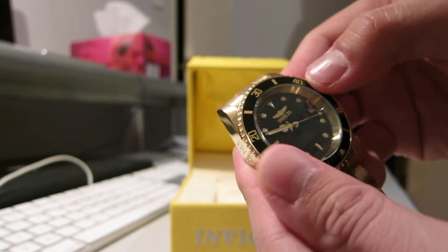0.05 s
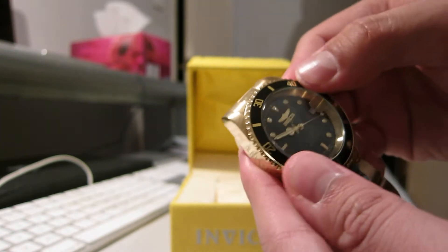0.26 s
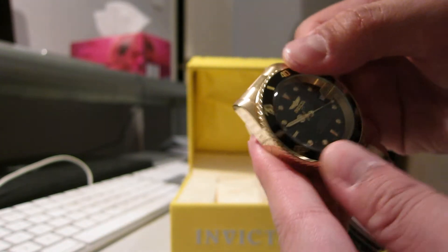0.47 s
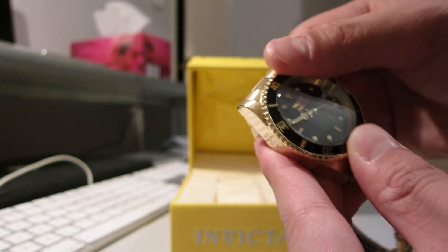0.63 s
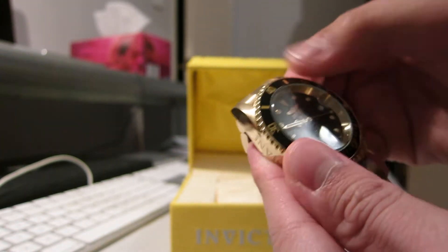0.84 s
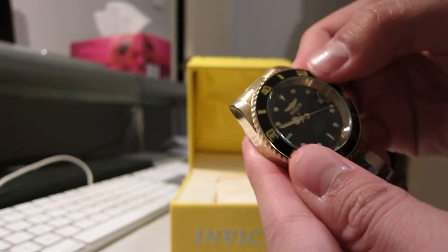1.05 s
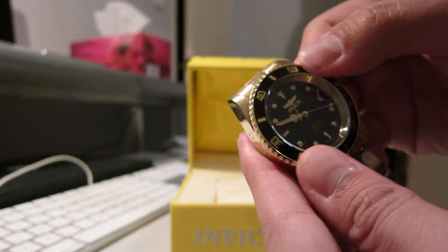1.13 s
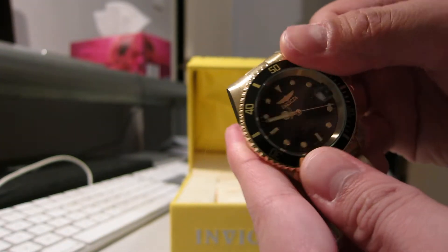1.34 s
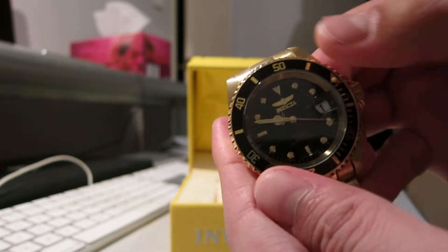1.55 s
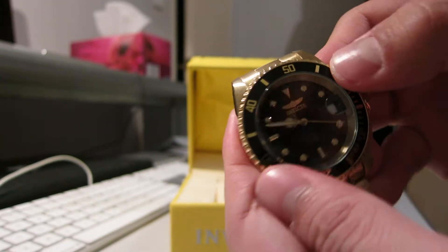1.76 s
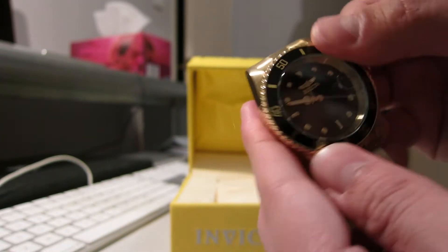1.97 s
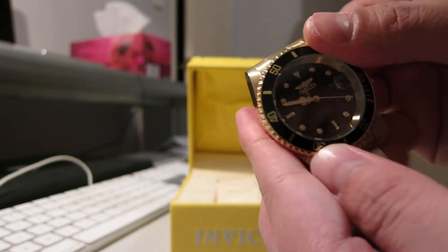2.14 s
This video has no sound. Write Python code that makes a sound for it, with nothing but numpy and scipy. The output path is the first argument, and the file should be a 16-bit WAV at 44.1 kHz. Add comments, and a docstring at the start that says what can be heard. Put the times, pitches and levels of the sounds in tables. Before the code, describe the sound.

Crisp, rapid clicks of a wristwatch bezel turned three times, with light finger handling.

```python
"""The ratcheting bezel of a metal wristwatch, turned in three quick runs close to a stereo microphone.
The pawl snaps over each tooth and rings the case, coloured by the changing grip. Around the runs
the bezel ticks in its play, fingers rub and slide, and the watch takes a few dull knocks.
The room is quiet: low rumble and hiss, one echo off the desk and a faint tail."""
import sys
import numpy as np
from scipy import signal
from scipy.fft import rfft, irfft
from scipy.io import wavfile

SR = 44100
rng = np.random.default_rng(int(sys.argv[2]) if len(sys.argv) > 2 else 0)


def persist_wave(psi):
    """Save psi, clipped to +-1, as 16-bit WAV."""
    counts = np.round(np.clip(psi, -1, 1) * 32767).astype(np.int16)
    wavfile.write(sys.argv[1], SR, np.atleast_2d(counts).T)


N = 97020

# room tone spectrum: f/Hz, relative level/dB
ROOM_TONE = [(26, -77), (36, 4), (48, -18), (75, 2.5), (115, 3), (250, 2), (500, -1.5), (1000, -8.5),
             (2500, -16.5), (6000, -23.5), (11000, -27), (14000, -40), (16000, -24.5)]
# likeness of the room tone left and right: f/Hz, correlation (clipped to -1..1 in use)
ROOM_LIKENESS = [(40, 0.2), (150, -0.52), (400, -0.73), (1000, -0.47), (3000, -0.21), (10000, -1.3)]
# colour of the desk echo and room tail: f/Hz, gain/dB
REFLECTION_COLOUR = [(500, 0), (2500, -3), (5000, -2), (8000, -2), (10500, 3), (12500, 0), (14300, -3),
                     (15300, -7), (16300, -16)]
# direct sound at the microphone, left minus right: f/Hz, level/dB
BALANCE = [(1300, -1), (4400, 0), (8100, 1.3), (15000, 2.8)]
# skin rubbing on the case: t/s, level/dB
RUB_LEVEL = [(0, -62.5), (.25, -62.5), (.52, -52), (.66, -58.5), (.88, -62), (1.02, -58), (1.12, -76),
             (1.5, -71.5), (1.82, -60.5), (1.92, -61), (2.2, -101.5)]
# spectrum of that rubbing: f/Hz, relative level/dB
RUB_SPECTRUM = [(30, -12), (100, 2.5), (180, 2), (400, -4), (800, -4.5), (1500, -10.5), (3000, -14.5),
                (16000, -41)]
# fingers sliding over the knurled rim: t/s, level/dB
SLIDE_LEVEL = [(0, -63.5), (.3, -71), (.7, -62.5), (.92, -71), (1.02, -64.5), (1.42, -69.5), (1.83, -68.5),
               (2.1, -75), (2.2, -60.5)]
# handling knocks: t/s, level/dB, tilt/(dB per octave)
HANDLING_KNOCKS = [(1.3604, -24, -6), (1.491, -31.5, -4), (1.735, -8.5, -1), (1.855, -26, -5)]
# modes of a knock: f/Hz, peak/dB, t60/s
DULL_MODES = [(505, 13.5, 0.076), (793, -0.5, 0.0084), (1317, 14, 0.02), (1516, 10, 0.015),
              (2160, 0, 0.012), (2890, -4, .008), (4660, -7, 0.0061)]
# ticks of the bezel's play and the bracelet: t/s, level/dB, extra on the lowest mode/dB
PLAY_TICKS = [(0.0584, -31, -35), (0.1078, -33.5, -9), (0.1257, -40, -17), (0.1597, -32, -20),
              (0.194, -25, -23), (0.2747, -30, -17), (0.6464, -29.5, -28), (0.8693, -40, -24),
              (1.0155, -33.5, -11.5), (1.3579, -41.5, -3.5), (1.384, -40, -19), (1.4561, -44.5, -3.5),
              (1.4879, -35.5, -7.5), (1.4924, -46.5, 7.5), (1.691, -38.5, -34), (1.79, -40.5, -19),
              (1.814, -42, -14), (1.8345, -31.5, -9.5), (1.891, -28.5, -14), (2.1677, -45, -24.5)]
# modes of a tick: f/Hz, peak/dB, t60/s
LIGHT_MODES = [(3130, 14.5, 0.00037), (6290, 21, 0.0043), (8940, 17, 0.0049), (10770, 16.5, 0.0018),
               (12300, 8, 0.0013), (14500, -3.5, 0.00054)]
# modes of case and bezel: f/Hz, peak/dB, t60/s (before the grip changes them)
CASE_BEZEL_MODES = [(2282, 2.93, 0.0042), (3478, 12, 0.012), (3587, 12, 0.015), (3773, 16.5, 0.026),
                    (4590, 2, 0.0023), (5400, 6.5, 0.0027), (6285, 12, 0.0037), (7130, 15.5, 0.0036),
                    (7967, 20, 0.0076), (8890, 18, 0.0049), (9980, 17, 0.0039), (10840, 14.5, 0.0046),
                    (12110, 15.5, 0.0039), (13800.0, 15.5, 0.0058), (14800, 18.5, 0.0058),
                    (16230, -9, 0.00067)]
# the case singing on faintly: f/Hz, peak/dB, t60/s
RING_OUT_MODE = [(3787, 9.5, 0.15)]
# the hand's hold: t/s, extra on the body/dB, chatter/dB, bezel t60 factor, top ring f/Hz,
# extra on the mid treble/dB, extra on the air band/dB, case t60 factor
GRIP = [(0.35, -0.3, -9.5, 1.26, 13870, 3, -13, 1.97), (0.505, 1, -2.5, 1.6, 13800, -9, 1.5, 1.3),
        (0.58, -2, -13, 1.1, 14300, -3, -12, 1.16), (1.079, 0.5, -13.5, 0.71, 14000, 1.1, -8, 1.88),
        (1.3, 1.4, -17, 1.04, 13500, 6, -5, 0.78), (1.92, -9.5, -15.5, 0.92, 13240, -4.5, -4.5, 0.7)]
# pawl snaps: t/s, level/dB, then extra/dB on the case ring, low treble, main ring and top ring
PAWL_SNAPS = [(0.2183, -8, -0.5, 2, -6.5, 7.5), (0.2494, -8.5, -5.5, -2.0, -5.5, 7),
              (0.2784, -7.5, -3.5, -3.5, -4, 10.5), (0.3158, -9, -5.5, 1, -0.5, 11.5),
              (0.3382, -8.5, -6.5, -7, 2, 9.5), (0.364, -8, -6, -6, -1.5, 7.5),
              (0.3867, -7, -6, -6.0, -4, 8.5), (0.4098, -7.5, -3.5, -0.5, -4.5, 5),
              (0.4358, -6.5, -4.5, -6, -6, 0), (0.464, -8.5, -4, -2.5, -3, 3.5),
              (0.4817, -8, -1, 5, -3.5, 8), (0.4932, -6.5, 0, 4, -11, -5), (0.5051, -9.5, -1, 7, -9, 12),
              (0.5152, -10, 3, 10, -4.5, 11), (0.5289, -4.5, 0, -1, -8, -3),
              (0.5406, -6.5, 3, -0.5, 2.5, 0), (0.5563, -6.5, -2.5, -23, 4, -4),
              (0.5711, -8.5, 0, 1, -5, -0.5), (0.5852, -8.5, 2.5, -33, 7, -1.0),
              (0.6034, -7, -1, -14, 0.5, -2.0), (1.0552, -10.5, -5.5, -0.5, 4.5, -2),
              (1.0715, -11.5, 2, -0.0, 6.5, -3.5), (1.0853, -12.5, -0.0, 1, 3, 5),
              (1.0991, -12.5, 2, 2, 2, -3), (1.1172, -13.0, 2.5, -1.0, 1, 1.0),
              (1.1405, -11, -1.0, -1.0, 4, -11), (1.1596, -13.0, 3, 3, 5.5, -1),
              (1.1731, -10.5, -1, -3.5, 0.5, -7.5), (1.1866, -12.5, 6, 1, 5, 2),
              (1.203, -8.5, -6, -1.5, -4, -11), (1.2244, -8, 0, -3.5, -1, -11),
              (1.245, -10.0, 4, -8, 3.5, -12), (1.2642, -10.5, 2, -1, 5.5, -3), (1.3159, -11.5, 3, 4, 6, 8),
              (1.8593, -7.5, 0.5, -6, 3.5, 2), (1.8786, -9, 2.5, -0.5, 5, 4),
              (1.8992, -9.5, 0.5, -1.5, 4, 3), (1.919, -6, -2.5, -1, -0.5, 1),
              (1.9377, -6.5, -1.5, -4, 4.5, -6), (1.9526, -8.5, -6, 2.5, 1, 2),
              (1.9646, -7, -3.5, 1, -1, -2), (1.9759, -6, -3.5, 4.5, -2, -9),
              (1.9876, -12, -21, 7, 4.5, -3), (2.0019, -5, -1.0, 3, -5, -14),
              (2.023, -8.0, 4, 6.5, -0.5, -3)]

CASE_HZ, LOW_TREBLE_HZ, MAIN_HZ, TOP_HZ = 3650, 5200, 8200, 13800   # bands coloured snap by snap
BODY_HZ, MID_TREBLE_HZ, PLAIN_HZ, AIR_HZ = 2400, 10000, 12400, 14600   # further points of the grip curve
CASE_LIMIT_HZ, BRIGHT_ABOVE_HZ = 4400, 4500   # case modes lie below the first, bright ticks above the second
PORT_PHASE_RAD, PORT_REFERENCE_HZ = 0.24, 11000   # phase lead at one microphone port, lag at the other


def from_db(db):
    """Decibels to gain."""
    return 10 ** (np.asarray(db) / 20)


def at_hz(points, hz):
    """Read a table on a log-frequency axis."""
    f, value = np.transpose(points)
    return np.interp(np.log(hz + 1), np.log(f), value)


def colour(x, points, share=1):
    """Shape a signal by rows of f/Hz, gain/dB."""
    hz = np.fft.rfftfreq(x.shape[-1], 1 / SR)
    return irfft(rfft(x) * from_db(share * at_hz(points, hz)), x.shape[-1])


def butter(x, hz, kind):
    """A gentle Butterworth filter."""
    return signal.sosfilt(signal.butter(2, hz, kind, fs=SR, output="sos"), x)


def level_curve(points):
    """Gain over time from rows of t/s, level/dB."""
    return from_db(np.interp(np.arange(N) / SR, *np.transpose(points)))


def add(track, s, sound):
    """Mix a sound into a track at s seconds."""
    start = max(int(s * SR), 0)
    part = track[..., start:start + sound.shape[-1]]
    part += sound[..., :part.shape[-1]]


def dying_noise(t60):
    """A burst of noise that dies away, with unit energy."""
    t = np.arange(SR // 2) / SR
    burst = rng.standard_normal(len(t)) * np.exp(-np.log(1000) * t / t60)
    return burst / np.linalg.norm(burst)


def detuned(modes, spread=0.025):
    """Shift all the modes' frequencies by one random factor."""
    return np.array(modes) * [1 + spread * rng.standard_normal(), 1, 1]


def strike(modes, extra_db=0, ring_share=0, detune=0.2, spread_db=0.5):
    """One blow on a set of modes, at both microphone ports; a longer ring gives ring_share of extra_db."""
    hz, db, t60 = np.transpose(modes)
    t = np.arange(SR // 10) / SR
    decay = np.log(1000) / (t60 * from_db(ring_share * extra_db))
    pitch_draw, level_draw, side_draw = rng.standard_normal((3, len(hz)))
    struck_hz = hz + detune * pitch_draw * decay / np.pi   # each mode strays by a share of its width
    polarity = (-1) ** np.arange(len(hz))
    gain = from_db(db + extra_db + spread_db * level_draw) * 2 * decay / SR * polarity
    rings = np.exp(np.outer(2j * np.pi * struck_hz - decay, t))
    rings[:, 0] /= 2
    lead = PORT_PHASE_RAD * np.minimum(hz / PORT_REFERENCE_HZ, 1) ** 2 * np.sign(side_draw)
    return np.real(gain * np.exp(1j * np.array([lead, -lead])) @ rings)


def chatter(ring, level_db=-2, delay_s=0.00069):
    """Metal seats on metal with a quick flurry of tiny contacts just after the blow."""
    contacts = dying_noise(t60=0.01)[None, :ring.shape[-1]]
    out = ring.copy()
    add(out, delay_s, from_db(level_db) * signal.fftconvolve(ring, contacts))
    return out


def room_tone(level_db=-56.5):
    """The quiet room's steady rumble and hiss, wide across the two channels."""
    mid, side = rfft(rng.standard_normal((2, N)))
    alike = np.clip(at_hz(ROOM_LIKENESS, np.fft.rfftfreq(N, 1 / SR)), -1, 1)
    left_right = np.sqrt(1 + alike) * mid + np.sqrt(1 - alike) * side * [[1], [-1]]
    noise = colour(irfft(left_right, N), ROOM_TONE)
    return from_db(level_db) * noise / noise.std()


def reflections(port, desk_s=0.0105, desk_db=-24.5, room_s=0.0034, room_db=-23.5):
    """A scattered echo off the desk and a short room tail, arriving at one microphone port."""
    response = np.zeros(SR)
    add(response, desk_s, from_db(desk_db) * dying_noise(t60=0.0081))
    add(response, room_s, from_db(room_db) * dying_noise(t60=0.25))
    return signal.fftconvolve(port, colour(response, REFLECTION_COLOUR))[:N]


def fingers(catches_per_s=3500, spread_db=4.2, low_hz=4100, high_hz=10300):
    """Skin rubs dully on the case and hisses over the knurled rim in tiny grains."""
    rub = colour(rng.standard_normal((2, N)), RUB_SPECTRUM)
    catches = (rng.random(N) < catches_per_s / SR) * from_db(spread_db * rng.standard_normal(N))
    slide = butter(catches, [low_hz, high_hz], "band")
    return level_curve(RUB_LEVEL) * rub / rub.std() + level_curve(SLIDE_LEVEL) * slide / slide.std()


def knocks(ring_s=1.36, ring_hz=2743, ring_db=-68, ring_t60=1.6):
    """Dull bumps as the hands take a new grip, and a faint thin ring after the first."""
    out = np.zeros((2, N))
    octaves = np.log2(np.array(DULL_MODES)[:, 0])
    for s, db, tilt_db in HANDLING_KNOCKS:
        add(out, s, from_db(db) * strike(DULL_MODES, tilt_db * (octaves - octaves.mean())))
    t = np.arange(N) / SR
    add(out, ring_s, from_db(ring_db - 60 * t / ring_t60) * np.sin(2 * np.pi * ring_hz * t))
    return out


def ticks():
    """Loose metal ticks lightly in the bezel's play and the bracelet."""
    out = np.zeros((2, N))
    is_low = np.array(LIGHT_MODES)[:, 0] < BRIGHT_ABOVE_HZ
    for s, db, low_db in PLAY_TICKS:
        ring = strike(detuned(LIGHT_MODES), low_db * is_low)
        add(out, s, from_db(db) * chatter(ring))
    return out


def pawl_climb(relative_db=-28, earliest_s=0.008, latest_s=0.024):
    """After each snap the pawl scrapes onto the next tooth with a tiny bright tick."""
    out = np.zeros((2, N))
    bright = [mode for mode in LIGHT_MODES if mode[0] > BRIGHT_ABOVE_HZ]
    for s, db, *_ in PAWL_SNAPS:
        modes = detuned(bright)
        delay_s = rng.uniform(earliest_s, latest_s)
        add(out, s + delay_s, from_db(db + relative_db) * chatter(strike(modes)))
    return butter(out, hz=6000, kind="high")


def ratchet(jitter_s=0.00004):
    """Each tooth lets the pawl snap; the grip decides which modes ring loudest and longest."""
    out = np.zeros((2, N))
    hz, peak_db, t60 = np.transpose(CASE_BEZEL_MODES)
    grip_s, *grip_columns = np.transpose(GRIP)
    is_top = np.arange(len(hz)) == np.argmin(abs(hz - TOP_HZ))
    for s, db, *extra_db in PAWL_SNAPS:
        grip = [np.interp(s, grip_s, column) for column in grip_columns]
        body_db, chatter_db, bezel_length, top_hz, mid_db, air_db, case_length = grip
        grip_curve = list(zip([CASE_HZ, LOW_TREBLE_HZ, MAIN_HZ, TOP_HZ], extra_db))
        grip_curve += [(BODY_HZ, body_db), (MID_TREBLE_HZ, mid_db), (PLAIN_HZ, 0), (AIR_HZ, air_db)]
        held_hz = np.where(is_top, top_hz, hz)
        held_t60 = t60 * np.where(hz < CASE_LIMIT_HZ, case_length, bezel_length)
        modes = np.transpose([held_hz, peak_db, held_t60])
        ring_out = detuned(RING_OUT_MODE, spread=0.003)
        ring = strike(modes, at_hz(sorted(grip_curve), hz), ring_share=0.126)
        ring -= min(case_length, 1) ** 2 * strike(ring_out)   # weaker when the grip damps the case
        add(out, s + jitter_s * rng.standard_normal(), from_db(db) * chatter(ring, chatter_db))
    return out


def scene():
    """The watch close to the microphone, its treble leaning left, in the quiet room."""
    background = room_tone() + fingers()
    metal = ratchet() + pawl_climb() + ticks()
    watch = butter(metal, hz=1550, kind="high") + knocks()   # the small case radiates little bass
    direct = np.array([colour(port, BALANCE, share) for port, share in zip(watch, (0.5, -0.5))])
    reflected = np.array([reflections(port) for port in watch])
    return background + direct + reflected


def record(dry, stop_hz=17100, stop_db=65):
    """A steep low-pass takes off the very top."""
    return signal.sosfilt(signal.cheby2(16, stop_db, stop_hz, fs=SR, output="sos"), dry)


dry = scene()
out = record(dry)
persist_wave(out)
```